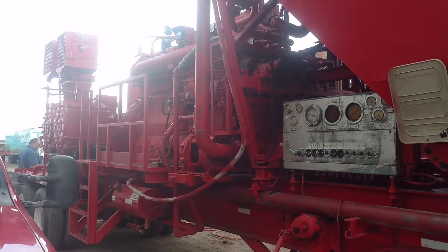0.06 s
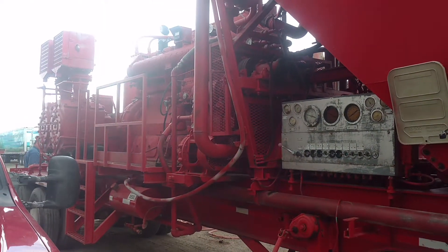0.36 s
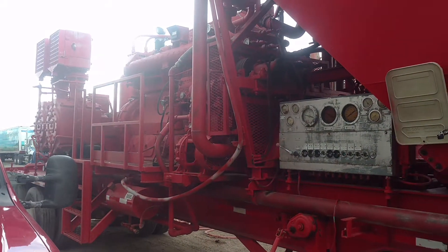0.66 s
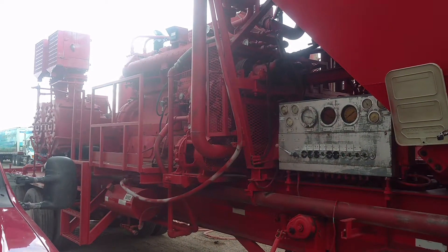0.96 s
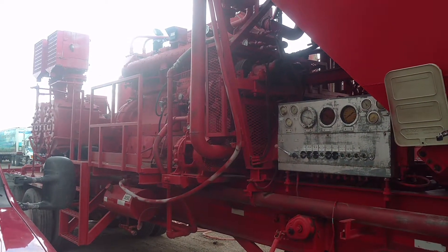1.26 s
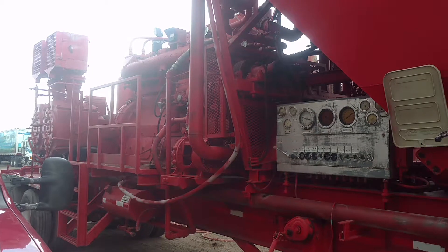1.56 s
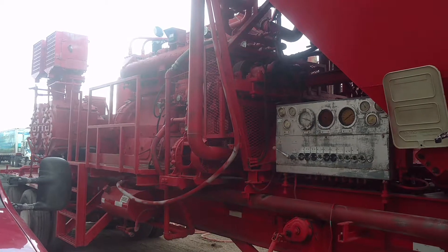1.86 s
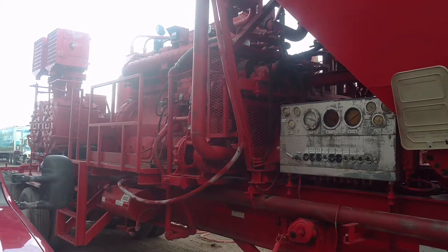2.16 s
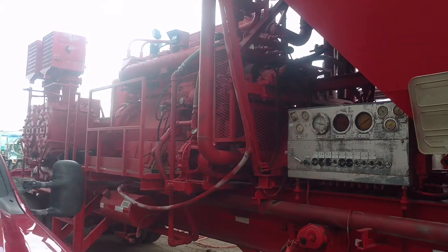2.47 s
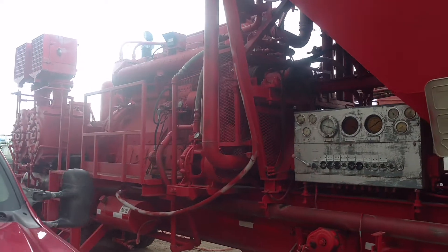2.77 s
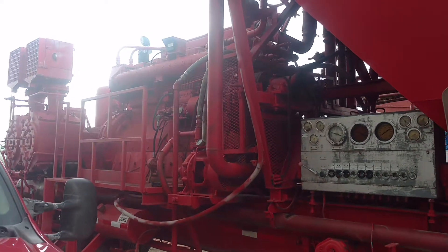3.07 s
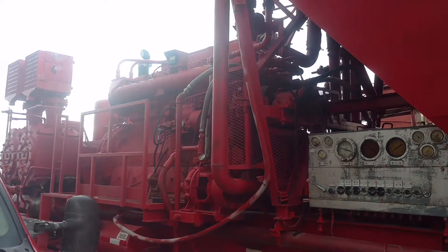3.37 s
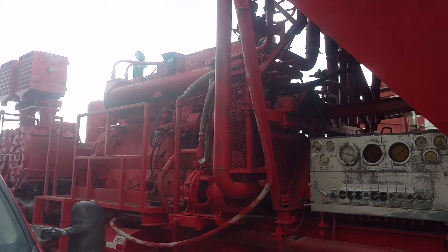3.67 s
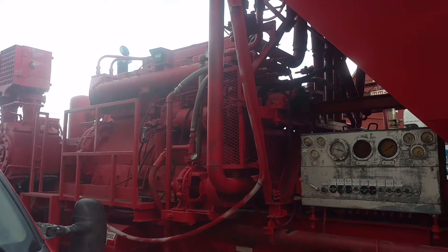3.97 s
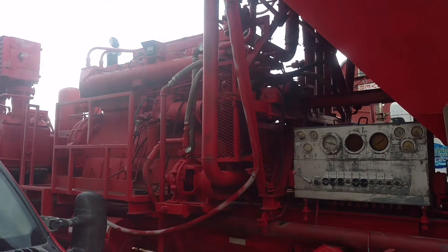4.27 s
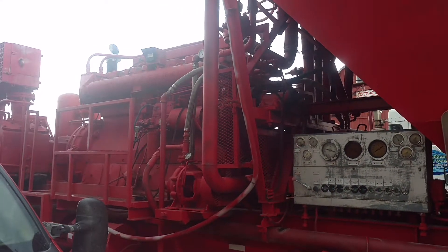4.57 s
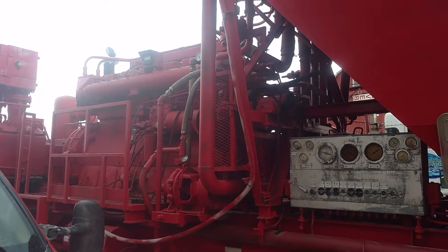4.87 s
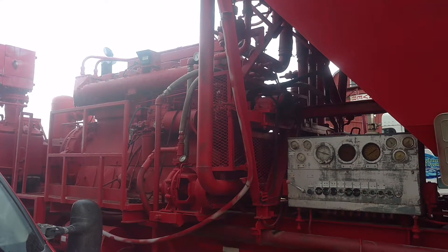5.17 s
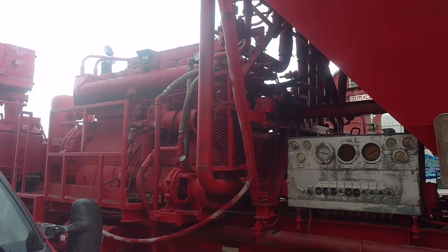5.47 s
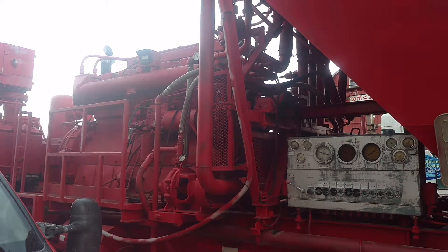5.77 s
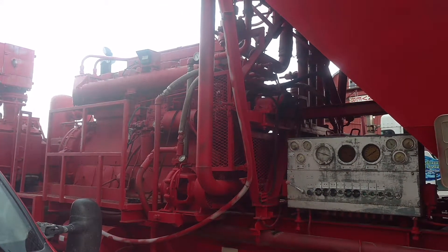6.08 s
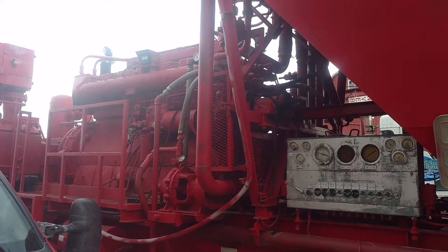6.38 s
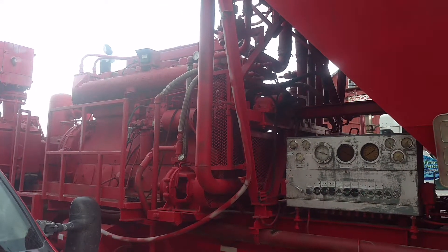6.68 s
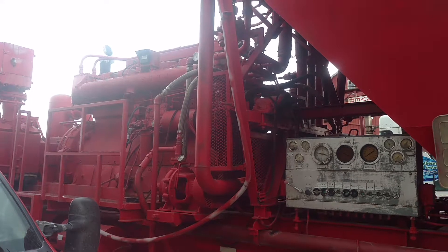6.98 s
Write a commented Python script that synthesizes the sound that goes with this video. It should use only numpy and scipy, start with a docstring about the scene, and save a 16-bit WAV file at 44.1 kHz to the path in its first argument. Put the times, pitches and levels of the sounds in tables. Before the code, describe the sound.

A big diesel engine idles steadily outdoors, with fast knocking, a metallic rattle and a low throb over airy hiss.

```python
"""Diesel pump trailer idling

A big diesel idles outdoors, a few metres from a slowly moving listener. Over a bed of air hiss and
dense clatter, every four-stroke cycle repeats a loose rattle, nine pump taps, booming panels, six
cylinder knocks and one exhaust throb. The frame drones, gears whine faintly, something squeals once,
and the balance of the knocks shifts as the listener moves from spot A to spot B."""
import sys
import numpy as np
from scipy import signal
from scipy.fft import rfft, irfft
from scipy.io import wavfile

SR = 44100
rng = np.random.default_rng(int(sys.argv[2]) if len(sys.argv) > 2 else 0)


def log_audio(samples):
    """Write samples as a 16-bit WAV file to the path given in sys.argv[1]."""
    # one column per channel
    frames = np.atleast_2d(samples).T
    # limit to full scale, then quantise
    limited = np.clip(frames, -1, 1)
    pcm = np.round(limited * 32767).astype(np.int16)
    wavfile.write(sys.argv[1], SR, pcm)


N = 313992
T = np.arange(N) / SR
HZ = np.fft.rfftfreq(N, 1 / SR)
CYCLE_HZ = 5.985  # four-stroke cycles a second; a "place" is a point in the cycle, 0-1

# The listener's path: time_s, travel (0 at spot A, 1 at spot B)
LISTENER_PATH = [(0, 0.02), (2.35, 0.01), (2.7, 0.49), (3.75, 0.52), (4.2, 0.98), (7.12, 1)]
# Level rides, each used about its own mean: time_s, block_db, covers_db, hiss_db
LEVEL_RIDES = [(0.0, -22.5, -19, -36.5), (0.57, -21.5, -18, -36), (0.66, -19.5, -15.5, -35),
               (0.81, -19.5, -17.5, -34.5), (0.92, -21.5, -15.5, -36), (1.12, -21.5, -20, -37),
               (1.42, -19.5, -15.5, -34.5), (1.56, -20, -18.5, -34.5), (1.7, -21, -16.5, -35.5),
               (2.1, -21.5, -20, -36), (2.19, -18.5, -18, -34.5), (2.32, -18, -16.5, -35.5),
               (2.38, -20, -19, -36), (2.62, -20, -18, -35.5), (2.8, -21, -19, -37.5),
               (3.25, -21, -19, -35.5), (3.84, -21, -19, -36), (4.08, -23, -21.7, -37.5),
               (4.24, -22, -20, -36), (4.6, -21, -20.5, -36), (4.96, -23.5, -21.5, -38),
               (5.2, -22.5, -20, -36), (5.46, -23, -23, -38), (5.76, -21.5, -18.5, -34.5),
               (5.92, -23, -22.5, -38), (6.16, -21.5, -19.5, -36.5), (6.5, -23, -22, -37.5),
               (6.8, -22, -19.5, -36), (7.1, -22.5, -20.5, -38)]
BLOCK_RIDE, COVERS_RIDE, HISS_RIDE = 1, 2, 3
# Fan and intake air: frequency_hz, density_db
AIR_SPECTRUM = [(20, -89), (60, -74), (110, -55.5), (400, -60.5), (2900, -63.5), (3700, -72.5),
                (4500, -67.5), (5700, -75), (6300, -70), (7300, -80), (8400, -79), (9400, -80),
                (10600, -91), (12500, -82.5), (14500, -99.5)]
# Tone of the clatter bed: frequency_hz, density_a_db, density_b_db
CLATTER_SPECTRUM = [(89.6, -71, -70), (145, -64, -60), (178, -55, -53.5), (290, -52.5, -54),
                    (472, -55, -55.5), (565, -51, -46.5), (643, -48.5, -47.5), (745, -48.5, -47),
                    (857, -63.5, -58.5), (893, -52, -53), (1100, -54.5, -54), (1380, -59.5, -61.5),
                    (1610, -54, -52.5), (2068, -45, -43.5), (2206, -52, -48.5), (2820, -64, -63.5),
                    (3430, -81.5, -77), (6000, -100, -100)]
# How much of the clatter is new in each cycle: frequency_hz, share (0-1)
CLATTER_FRESHNESS = [(200, 0.37), (400, 0.43), (650, 0.41), (1100, 0.57), (2000, 0.76), (2900, 1)]
# Gear tones: pitch_hz, level_db
GEAR_TONES = [(1688, -37.5), (4884, -50), (7328, -61)]
# Contour of the squeal: time_s, pitch_hz, level_db
SQUEAL_CONTOUR = [(.28, 1620, -36), (.32, 1645, -26), (.36, 1640, -29), (.41, 1554, -28), (.46, 1517, -25),
                  (.5, 1500, -47)]
# Stray clanks and thuds: start_s, pitch_hz, level_db, decay_s
STRAY_HITS = [(2.666, 1960, -5, 0.0014), (2.71, 1940, -12, 0.0016), (3.592, 186, -20, 0.0053),
              (4.016, 178.5, -20, 0.0042)]
# Resonances of the loose part: pitch_hz, half_width_hz, gain_db
RATTLE_MODES = [(2855, 70, 5), (4485, 124, -9)]
# Strokes that shake it in every cycle: place, half_width_s, level_a_db, level_b_db
RATTLE_SHAKES = [(.03, .004, -41, -47), (.565, .004, -40, -48), (.612, .005, -37, -39.5),
                 (.66, .006, -42, -39), (.74, .006, -39, -39.5), (.81, .005, -38, -42),
                 (.92, .005, -43, -39), (.968, .0045, -47, -34.5)]
# Its occasional harder jolts: time_s, half_width_s, level_db
RATTLE_JOLTS = [(.636, .004, -26), (1.44, .004, -26), (3.283, .004, -22), (3.44, .004, -29),
                (3.465, 0.013, -32), (4.504, 0.0052, -26), (4.839, 0.0085, -23)]
# Engine orders that the frame amplifies: cycle_multiple, level_a_db, level_b_db
FRAME_ORDERS = [(36, -47, -46), (66, -47, -41), (86, -40, -48), (93, -41, -38), (132, -47, -41),
                (173, -50, -40), (179, -37.5, -41), (188, -39, -43)]
# Ring of the pump housing: pitch_hz, decay_s, gain_a_db, gain_b_db
HOUSING_MODES = [(1048, 0.0025, -17, -8), (1098, 0.0015, -1.5, -1.5)]
# Panel booms, each heard along one stretch of the path: travel, place, pitch_hz, half_width_s, level_db
PANEL_BOOMS = [(0, .115, 1108, .0065, -21), (0, .162, 620, .006, -22), (0, .226, 700, .013, -23.5),
               (0, .304, 604, .026, -23), (0, .457, 520, .012, -25), (0, .61, 1072, .018, -28.5),
               (0, .74, 690, .012, -23.5), (0, .811, 580, .009, -18), (0, .83, 1126, .018, -25.5),
               (0, .884, 704, .014, -18), (0, .989, 595, .005, -21), (.5, .056, 617, .0025, -20),
               (.5, .084, 1118, .003, -23), (.5, .174, 634, .018, -25), (.5, .339, 590, .008, -22),
               (.5, .375, 671, .0055, -22), (.5, .591, 662, .0055, -14.5), (.5, .906, 985, .012, -28),
               (1, .032, 718, .008, -20.5), (1, .129, 571, .007, -21.5), (1, .318, 655, .013, -17.5),
               (1, .383, 734, .012, -24), (1, .483, 645, .008, -24), (1, .585, 642, .0095, -16.5),
               (1, .884, 1035, .005, -22), (1, .973, 634, .011, -21.5)]
# Brief ring of the thin covers: pitch_hz, decay_s, gain_a_db, gain_b_db
COVER_MODES = [(2051, 0.0011, -4.5, -0.5), (1877, 0.00073, -11.5, -5.5)]
# The six cylinders in firing order: place, level_a_db, level_b_db
FIRINGS = [(.09, -16, -9.5), (.24, -2.5, -4), (.455, -16, -8.5), (.61, -4.5, -6), (.735, -11, -7.5),
           (.915, -1.5, -7)]
# The exhaust note: cycle_multiple, level_a_db, level_b_db
EXHAUST_ORDERS = [(8, -66, -64.0), (10, -60, -62.6), (12, -62.4, -73), (14, -44, -39), (15, -45, -45.5),
                  (18, -44, -37.5), (20, -38, -36.5), (21, -69, -31.5), (22, -36, -37), (23, -38, -39.5),
                  (24, -34.5, -31), (25, -33, -47), (26, -45.5, -36.5)]
# Stereo image: frequency_hz, left_lead_rad, coherence (0-1), left_minus_right_db
STEREO_IMAGE = [(70, -1.45, .96, 4), (180, -1.25, .96, -3), (300, -.8, .86, -10), (410, .35, .62, -7.5),
                (520, .15, .83, -2.4), (660, .1, .9, -1.6), (790, 0, .9, 1.5), (860, -.65, .85, -2.6),
                (1200, -.25, .95, -2.2), (1500, -.5, .93, -2.3), (2030, -2, .9, -5.1),
                (2550, -3.1, .9, -2.4), (2850, -3.35, .65, -2), (3250, -3.3, .2, -1), (3500, -6.2, .5, 0),
                (3900, -6.2, .8, -1), (4350, -6.9, .4, -2), (4750, -8.9, .7, -2), (5200, -9.4, .85, -1.5),
                (7800, -15.7, .85, -.5), (10300, -22, .85, -.3), (14200, -31.4, .85, -.2)]


def gain_of(db):
    """Decibels to amplitude."""
    return 10 ** (np.asarray(db) / 20)


def spectrum(table, column=1):
    """One column of a table spread over HZ, on a log-frequency axis."""
    columns = np.transpose(table)
    return np.interp(np.log(HZ + 1), np.log(columns[0] + 1), columns[column])


def curve(table, column=1):
    """One column of a table over time."""
    columns = np.transpose(table)
    return np.interp(T, columns[0], columns[column])


def ride(column):
    """A fader move: the gain of one level ride about its mean."""
    db = curve(LEVEL_RIDES, column)
    return gain_of(db - db.mean())


def spot_shares():
    """Crossfade weights of spots A and B as the listener moves."""
    travel = curve(LISTENER_PATH)
    return 1 - travel, travel


def along_path(a_db, b_db):
    """Level in dB over time, crossfading in power from spot A to spot B."""
    share_a, share_b = spot_shares()
    return 10 * np.log10(share_a * gain_of(a_db) ** 2 + share_b * gain_of(b_db) ** 2)


def wander(rate_hz):
    """Smooth random modulation of rms 1."""
    drift = irfft(rfft(rng.standard_normal(N)) * np.exp(-(HZ / rate_hz) ** 2), N)
    return (drift - drift.mean()) / drift.std()


def colour(white, density_db):
    """Shapes white noise of rms 1 to a spectral density."""
    return irfft(rfft(white) * gain_of(density_db), N) * np.sqrt(SR / 2)


def add_ring(mix, start_s, hz, db, decay_s):
    """Mixes in one struck casting: it swells for decay_s, then dies away with that time constant."""
    t = (np.arange(1, 9 * decay_s * SR) - start_s * SR % 1) / SR
    ring = gain_of(db) * t / decay_s * np.exp(1 - t / decay_s) * np.sin(2 * np.pi * hz * t)
    start = int(np.floor(start_s * SR))
    ring = ring[max(-start, 0):]
    span = mix[max(start, 0):][:len(ring)]
    span += ring[:len(span)]


def strike(cycles, place, modes, a_db, b_db, jitter_s, uneven_db=2.6):
    """One blow a cycle rings a part, each mode a little early or late, harder or softer."""
    out = np.zeros(N)
    times = np.interp(np.arange(place, cycles[-1], 1), cycles, T)
    for hz, decay_s, mode_a_db, mode_b_db in modes:
        levels_db = np.interp(times, T, along_path(a_db + mode_a_db, b_db + mode_b_db))
        for start_s, db, (late, hard) in zip(times, levels_db, rng.standard_normal((64, 2))):
            add_ring(out, start_s + jitter_s * late, hz, db + uneven_db * hard, decay_s)
    return out


def orders(cycles, table, places, scatters_rad, uneven_db, trim_db):
    """Harmonics of the cycle rate, their phases scattered about one place for each spot."""
    out = np.zeros(N)
    for multiple, *levels_db in table:
        skew = rng.standard_normal()
        for share, db, place, scatter in zip(spot_shares(), levels_db, places, scatters_rad):
            phase = 2 * np.pi * multiple * (cycles - place) + scatter * skew
            out += share * gain_of(db) * np.cos(phase)
    return out * gain_of(trim_db + uneven_db * wander(1.9))


def air_hiss(cycles, surge_place=.53, rise_cycles=.063, surge_db=1.5, flicker_db=1.0):
    """Fan and intake air: a hiss that surges about halfway through each cycle and ebbs away."""
    surge = np.interp((cycles - surge_place) % 1, [0, rise_cycles, 1], [0, 1, 0])
    pumping_db = surge_db * (surge - .5) + flicker_db * wander(50)
    hiss = colour(rng.standard_normal((2, N)), spectrum(AIR_SPECTRUM))
    return hiss * gain_of(pumping_db) * ride(HISS_RIDE)


def clatter(cycles, split_hz=1400):
    """A noise bed for countless small blows and echoes: part loops with the cycle, part is always new."""
    size = 2 * round(SR / CYCLE_HZ / 2)  # samples in one cycle
    freshness = np.clip(spectrum(CLATTER_FRESHNESS), .01, .99)
    low_cut_db = 20 * np.log10(1 + (60 / (HZ + 1)) ** 4)  # castings radiate no deep bass
    bed = np.zeros((2, N))
    for column, share in enumerate(spot_shares(), start=1):
        loops = irfft(np.exp(2j * np.pi * rng.random((2, size // 2 + 1)))) * np.sqrt(size)
        looped = np.array([np.interp(cycles % 1, np.arange(size) / size, loop) for loop in loops])
        density_db = spectrum(CLATTER_SPECTRUM, column) - low_cut_db
        repeating = colour(looped, density_db + 10 * np.log10(1 - freshness))
        fresh = colour(rng.standard_normal((2, N)), density_db + 10 * np.log10(freshness))
        bed += np.sqrt(share) * (repeating + fresh)
    lows = irfft(rfft(bed) / (1 + (HZ / split_hz) ** 8), N)
    return lows * ride(BLOCK_RIDE) + (bed - lows) * ride(COVERS_RIDE)


def gear_whine(drift=.001, waver_db=3.5):
    """Thin gear tones that waver in pitch and strength."""
    out = np.zeros(N)
    for hz, db in GEAR_TONES:
        level = gain_of(db + waver_db * wander(4.4))
        pitch_hz = hz * (1 + drift * wander(14))
        out += level * np.sin(2 * np.pi * np.cumsum(pitch_hz) / SR)
    return out


def squeal():
    """One short, faint squeal that falls in pitch."""
    gate = (T > SQUEAL_CONTOUR[0][0]) & (T < SQUEAL_CONTOUR[-1][0])
    phase = 2 * np.pi * np.cumsum(curve(SQUEAL_CONTOUR)) / SR
    return gate * gain_of(curve(SQUEAL_CONTOUR, 2)) * np.sin(phase)


def stray_hits():
    """Single clanks and thuds outside the rhythm."""
    out = np.zeros(N)
    for hit in STRAY_HITS:
        add_ring(out, *hit)
    return out


def rattle(cycles, floor_db=-47, uneven_db=.9, ragged_db=1.3, trim_db=2):
    """A loose metal part buzzes faintly, chatters through every cycle and now and then jolts."""
    resonance = sum(gain_of(db) / (1 + ((HZ - hz) / width) ** 2) for hz, width, db in RATTLE_MODES)
    buzz = irfft(rfft(rng.standard_normal((2, N))) * resonance, N)
    power = np.full(N, gain_of(floor_db) ** 2)
    for place, width_s, a_db, b_db in RATTLE_SHAKES:
        offset_s = ((cycles - place + .5) % 1 - .5) / CYCLE_HZ
        power += gain_of(along_path(a_db, b_db)) ** 2 * np.exp(-(offset_s / width_s) ** 2)
    power *= gain_of(uneven_db * wander(22)) ** 2
    for time_s, width_s, db in RATTLE_JOLTS:
        power += gain_of(db) ** 2 * np.exp(-((T - time_s) / width_s) ** 2)
    envelope = np.sqrt(power) * gain_of(trim_db + ragged_db * wander(83))
    return envelope * buzz / buzz.std()


def frame_drone(cycles):
    """The frame sings along on a few higher engine orders."""
    drone = orders(cycles, FRAME_ORDERS, (.89, .585), scatters_rad=(2.2, .85), uneven_db=.9, trim_db=4)
    return drone * ride(BLOCK_RIDE)


def pump_taps(cycles, strokes=9, first_place=.088, tap_db=-20.5):
    """Evenly spaced strokes of a gear-driven pump ring its housing."""
    places = first_place + np.arange(strokes) / strokes
    taps = sum(strike(cycles, place, HOUSING_MODES, tap_db, tap_db, jitter_s=.00026) for place in places)
    return taps * ride(BLOCK_RIDE)


def panel_booms(cycles, trim_db=-.8, uneven_db=1.0, jitter_s=.00009):
    """Panels of the block swell and fade once a cycle; the listener passes from one set to the next."""
    travel, out = curve(LISTENER_PATH), np.zeros(N)
    for heard_at, place, hz, width_s, db in PANEL_BOOMS:
        nearness = np.sqrt(np.clip(1 - 2 * abs(travel - heard_at), 0, 1))
        cycle = np.floor(cycles - place + .5).astype(int)
        late, hard = rng.standard_normal((64, 2))[cycle].T
        t = (cycles - place - cycle) / CYCLE_HZ - jitter_s * late
        envelope = gain_of(db + uneven_db * hard) * np.exp(-(t / width_s) ** 2 / 2)
        out += nearness * envelope * np.cos(2 * np.pi * hz * t)
    return gain_of(trim_db) * out * ride(BLOCK_RIDE)


def cylinder_knocks(cycles, valve_lag_s=.0058, valve_a_db=-5, valve_b_db=-4, trim_db=-4):
    """Each firing strikes the covers; a valve seats just after and strikes them again, more softly."""
    out = np.zeros(N)
    for place, a_db, b_db in FIRINGS:
        out += strike(cycles, place, COVER_MODES, a_db, b_db, jitter_s=.00023)
        seating = place + valve_lag_s * CYCLE_HZ
        out += strike(cycles, seating, COVER_MODES, a_db + valve_a_db, b_db + valve_b_db, jitter_s=.00035)
    return gain_of(trim_db) * out * ride(COVERS_RIDE)


def exhaust_throb(cycles):
    """Unequal firings give one low throb a cycle."""
    throb = orders(cycles, EXHAUST_ORDERS, (.245, .245), scatters_rad=(.45, .45),
                   uneven_db=1.8, trim_db=-1.5)
    return throb * ride(HISS_RIDE)


def stereo_pair(direct, diffuse):
    """Two microphones hear the engine with a phase and level offset; the diffuse sound adds width."""
    lead_rad, coherence, balance_db = (spectrum(STEREO_IMAGE, column) for column in (1, 2, 3))
    mid = rfft(direct) + np.sqrt((1 + coherence) / 2) * rfft(diffuse[0])
    side = np.sqrt((1 - coherence) / 2) * rfft(diffuse[1])
    balance = gain_of(balance_db)
    pair = np.array([(mid + side) * balance, (mid - side) * np.exp(-1j * lead_rad)])
    return irfft(pair * np.sqrt(2 / (1 + balance ** 2)), N)


def scene():
    """The governor holds the idle almost perfectly steady; every rhythmic layer follows the crank."""
    cycles = np.cumsum(CYCLE_HZ * (1 + .0003 * wander(2))) / SR
    hits = panel_booms(cycles) + cylinder_knocks(cycles) + pump_taps(cycles)
    tones = exhaust_throb(cycles) + frame_drone(cycles) + gear_whine()
    diffuse = clatter(cycles) + air_hiss(cycles) + rattle(cycles)
    return stereo_pair(hits + tones + squeal() + stray_hits(), diffuse)


def record(dry, ceiling=.95, cutoff_hz=14800):
    """Soft-clips the peaks near full scale and cuts the very top end."""
    rounded = dry / (1 + (dry / ceiling) ** 8) ** (1 / 8)
    lowpass = signal.firwin(511, cutoff_hz, window=("kaiser", 9), fs=SR)
    return signal.oaconvolve(rounded, lowpass[None], "same", axes=1)


dry = scene()
out = record(dry)
log_audio(out)
```